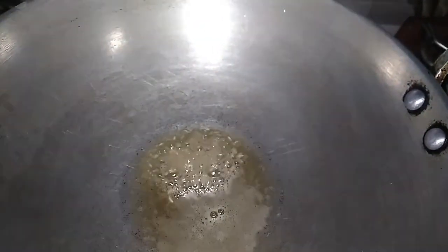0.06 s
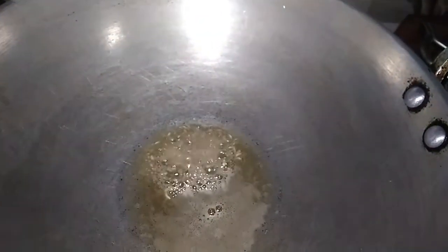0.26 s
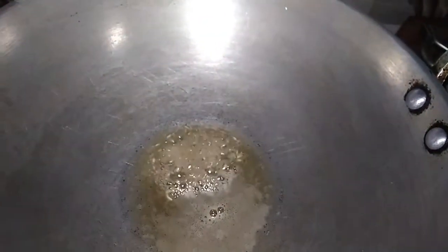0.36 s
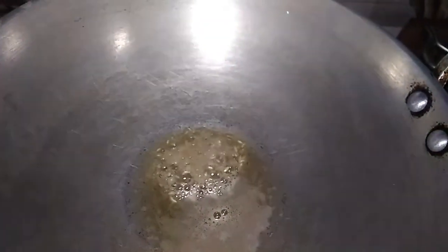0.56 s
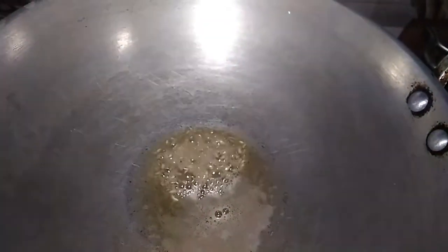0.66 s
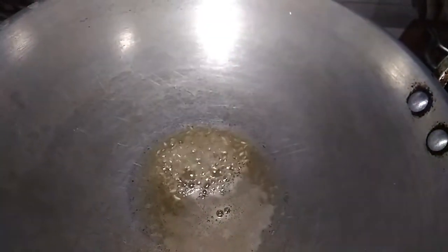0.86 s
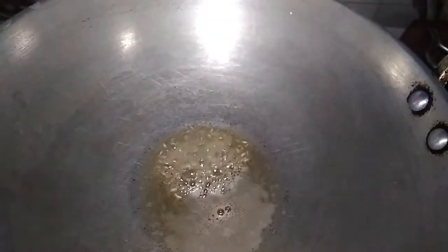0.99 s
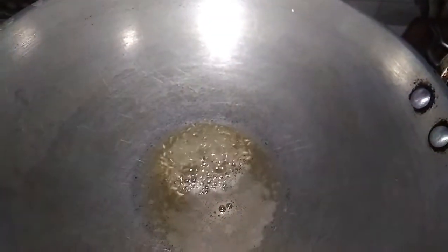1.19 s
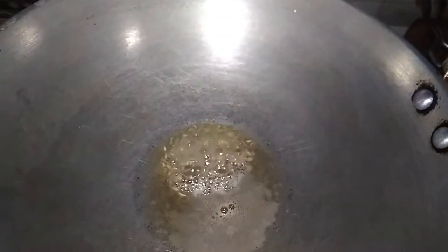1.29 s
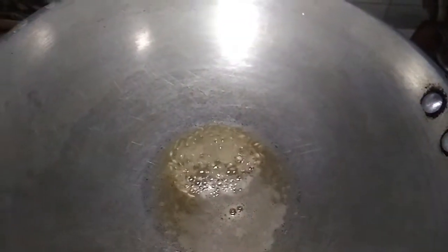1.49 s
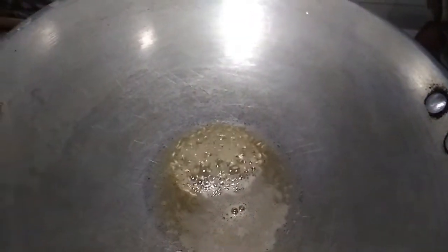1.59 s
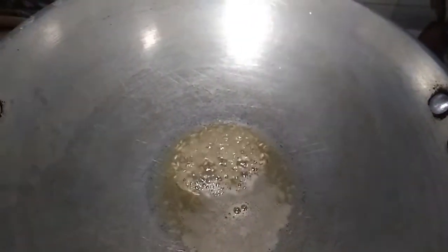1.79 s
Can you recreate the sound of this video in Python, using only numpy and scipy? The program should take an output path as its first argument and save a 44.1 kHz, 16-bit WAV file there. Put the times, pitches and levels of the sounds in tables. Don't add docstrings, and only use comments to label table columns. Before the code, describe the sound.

Bright crackling pops of spices in hot fat, one metallic clank, faint sizzle in a quiet kitchen

```python
import sys
import numpy as np
from scipy import signal
from scipy.fft import rfft, irfft, next_fast_len
from scipy.io import wavfile
from scipy.ndimage import uniform_filter1d

SR = 44100
rng = np.random.default_rng(int(sys.argv[2]) if len(sys.argv) > 2 else 0)


def store_wav(level_fs):
    pcm = np.round(np.clip(np.atleast_2d(level_fs), -1, 1) * 32767)
    wavfile.write(sys.argv[1], SR, pcm.T.astype(np.int16))


def invert_db(level):
    return 10 ** (np.asarray(level, dtype=float) / 20)


N = 81585

POP_TIMES_S = [.2008, .2115, .242, .2678, .27, .4694, .6792, .6848, .6898, .7697, .857, .9562, 1.0809,
               1.4724, 1.5227, 1.5756, 1.5972, 1.7933]
# (peak [dB], pitch [Hz], spray t60 [s], spray re peak [dB])
POP_VOICES = [(-22, 6850, 0.26, -22.5), (-17, 9400, 0.95, -37), (-28, 7900, 0.44, -41),
              (-29.5, 8700, 0.25, -33), (-18.5, 7800, 0.46, -27), (-8, 7730, 0.079, -26.5),
              (-28.5, 7700, 0.66, -12.5), (-17, 7350, 0.15, -20.5), (-19, 9000, 0.3, -32),
              (-18.5, 6360, 0.32, -18.5), (-25, 7050, 0.36, -21.5), (-59, 9270, 0.24, -7),
              (-36, 9100, 0.26, -28), (-24.5, 9400, 0.83, -27), (-27, 6940, 0.39, -22),
              (-23.5, 7200, 0.34, -18), (-37.5, 9500, 0.4, -16.5), (-45, 8700, 0.24, -14.5)]
SECOND_VOICE_TIMES_S = [.2126, .4696, .686, 1.0815, 1.474]
# (peak [dB], pitch [Hz], spray t60 [s], spray re peak [dB])
SECOND_VOICES = [
    (-28.5, 12000, .3, -19.5),
    (-20.5, 6500, 0.51, -14.5),
    (-36, 12100, 0.82, -8),
    (-46, 14000, 0.57, -13),
    (-50.5, 10500, 0.27, -1.5),
]
BOWL_ECHO_DB = [
    [2],
    [-8],
]
# (frequency [Hz], density [dB/Hz])
SPRAY_COLOUR = [(880, -51.5), (1500, -15), (2380, 7), (3770, -24), (6400, -23.5), (7980, -5.5),
                (15000, -33.5), (15400, -36.5), (16400, -99.5)]
# (time [s], peak [dB], pan [dB], pitch [Hz])
SNAP_EVENTS = [
    (0.2248, -50.5, 15, 1840),
    (0.4694, -26, 5, 2220),
    (0.77, -37.5, 14, 4800),
    (1.522, -58, 4, 2980),
    (1.5744, -32.5, 9, 2870),
    (1.794, -61, 6, 4000),
]
# (frequency [Hz], density [dB/Hz])
SNAP_COLOUR = [(59, -47.5), (100, -5.5), (1010, 3), (1560, -29), (2130, -5), (4460, 15.5), (5000, 18),
               (6500, -51), (11000, -120)]
# (time [s], peak [dB], pan [dB], t60 [s], low body [dB])
CLANK_EVENTS = [
    (0.6838, -18.5, 8, 0.34, 5),
    (0.845, -51.5, 6, 0.79, 20.5),
    (0.883, -43, 7, 0.28, 13.5),
    (0.951, -41, 7.5, 0.21, 9),
    (1.001, -51, 4.5, 0.57, 13.5),
    (1.082, -39.5, 7, 0.36, 14),
    (1.135, -47, 7, 0.15, 20),
]
# (frequency [Hz], level [dB])
STEEL_MODES = [(312.2, -73.5), (608.3, -71.5), (1217, -80.5), (1728, -54.5), (1787, -63), (1863, -61.5),
               (1986, -52), (2008, -48.5), (2062, -55.5), (2169, -75.5), (2239, -65.5), (2293, -51),
               (2347, -53.5), (2799, -69)]
# (frequency [Hz], density [dB/Hz])
CLATTER_COLOUR = [(150, -50.5), (260, -17.5), (1100, -13.5), (2050, -1), (4310, -22), (8340, -15.5),
                  (12900, -24), (15600, -37), (16400, -83)]
# (frequency [Hz], width [Hz], gain [dB])
LOW_BODY_MODES = [(313, 30, 6), (591, 49, -5.5), (430, 17, 1), (970, 130, -2), (1221, 80, 5.5)]
RATTLE_TIMES_S = [.0003, .0038, .0078]
# (time [s], level [dB], half length [s], pan [dB], frequency [Hz])
THUMP_EVENTS = [(0.039, -64.5, 0.024, 9, 69), (0.143, -68, 0.024, 5, 86.6), (0.326, -79.5, 0.015, 2, 85),
                (0.478, -49, 0.0047, 12, 40), (0.611, -84, 0.071, 31, 83.2),
                (0.707, -62, 0.0082, 17.5, 49.8), (0.758, -48, 0.02, 5.5, 77.2),
                (0.942, -70, 0.063, 7.5, 81.5), (1.501, -81, 0.011, 31, 39.6), (1.601, -51, 0.027, 9, 73.8),
                (1.797, -69.5, 0.032, 9, 79)]
# (time [s], level [dB], pan [dB])
FIZZ_COURSE = [(0.0, -56.5, 21.5), (0.158, -57, 20), (0.226, -47, 3.5), (0.432, -54.5, 14.5),
               (0.468, -51.5, 12.5), (0.475, -41, 6.5), (0.69, -51.5, 8.5), (0.752, -54, 16.5),
               (0.864, -51, 7.5), (1.01, -81.5, 21), (1.499, -73.5, 4), (1.526, -60.5, 24), (1.808, -84, 1),
               (1.85, -80, 19)]
# (frequency [Hz], density [dB/Hz])
FIZZ_COLOUR = [(710, -79.5), (1200, -33.5), (2880, -20.5), (4760, -23.5), (5140, -10.5), (8410, 1.5),
               (12100, -16.5), (15700, -25), (16400, -54)]
# (frequency [Hz], density [dB/Hz])
AIR_COLOUR = [(230, -46.5), (300, -27), (497, -23), (1520, -24), (4810, -7), (5700, -10), (8410, -2),
              (13800, -16.5), (16400, -25.5)]
# (frequency [Hz], pan [dB])
AIR_PAN_CURVE = [(60, 8.5), (240, 7.5), (950, 4), (3770, 8), (15000, 1.5)]
# (frequency [Hz], share [0-1])
COMMON_SHARE = [(100, 0.88), (600, 0.85), (2500, 0.071), (10000, 0.28)]
# (frequency [Hz], gain [dB])
RIGHT_PORT_GAIN = [(300, 1), (2000, -3.5), (7000, -10.5), (10000, 2), (15000, 3)]
# (frequency [Hz], width [Hz], depth [dB])
HOUSING_DIPS = [(1590, 120, 4.5), (4585, 240, 6.5), (3410, 210, 1.5)]

CLICK_T60_S, BOWL_DELAY_S, FLIGHT_S = 0.0008, 0.0011, 0.0001
CLICK_WIDTH, CLICK_SKIRT = 0.4, 0.9
POP_PAN_DB, SPRAY_PAN_DB, GRAIN_DB = 6.5, 2.5, 1.8
SPRAY_DRIES_S, BOWL_COLOUR_SHARE = 0.13, 0.2
SNAP_S, SNAP_ROOM_DB, SNAP_ROOM_T60_S = 0.003, -13, 0.25
CRACK_DB, CRACK_WIDTH = 6, 1.1
CLANK_RISE_S, SOFTER_PER_DB, CLANK_DRIES_S = 0.00025, 0.2, 0.48
RING_DB, RING_T60_S = 46, 0.23
BODY_HZ, BODY_WIDTH_HZ, BODY_GAIN = 2207, 690, 0.52
RATTLE_DB, RATTLE_HZ, RATTLE_WIDTH_HZ = 4.5, 1900, 830
OVERTONE_RATIO, OVERTONE_DB = 1.9, -11
RUMBLE_DB, RUMBLE_FLOOR_DB = -10, -93
BUBBLES_PER_S, BUBBLE_SPREAD_DB, AIR_DB = 960, 7, -65
TOP_HZ, LEFT_LAG_S = 16600, 0.00023
T = np.arange(SR // 2) / SR


def unit(x):
    return x / np.sqrt(np.mean(x ** 2, axis=-1, keepdims=True) + 1e-20)


def top_one(x):
    return x / np.abs(x).max(axis=-1, keepdims=True)


def along(points, hz):
    f, v = np.transpose(points)
    return np.interp(np.log(hz + 1), np.log(f + 1), v)


def filtered(x, response):
    m = next_fast_len(x.shape[-1] + 4096)
    return irfft(rfft(x, m) * response(np.fft.rfftfreq(m, 1 / SR)), m)[..., :x.shape[-1]]


def peak(hz, centre_hz, width_hz):
    return 1j * hz * width_hz / (centre_hz ** 2 - hz ** 2 + 1j * hz * width_hz)


def noise(response, size):
    share = lambda f: np.clip(along(COMMON_SHARE, f), 0, 1)
    common = filtered(rng.standard_normal(size), lambda f: response(f) * np.sqrt(share(f)))
    own = filtered(rng.standard_normal((2, size)), lambda f: response(f) * np.sqrt(1 - share(f)))
    return unit(common + own)


def burst(response, shape):
    gate = lambda f: np.minimum(np.abs(response(f)) / np.abs(response(f)).max() * 8, 1)
    return filtered(noise(response, size=len(T)) * shape, gate)


def fading(t60_s, dries_s):
    return invert_db(-60 * T / t60_s - 10 * (T / dries_s) ** 2)


def sides(pan_db):
    return invert_db(np.multiply.outer([0.5, -0.5], np.atleast_1d(pan_db)))


def add(out, s, x):
    out[:, max(round(s * SR), 0):][:, :x.shape[1]] += x


def pops():
    out = np.zeros((2, N + SR))
    times_s = [*POP_TIMES_S, *SECOND_VOICE_TIMES_S]
    voices = [*POP_VOICES, *SECOND_VOICES]
    for s, (db, hz, t60_s, spray_db) in zip(times_s, voices):
        band = lambda f: peak(f, hz, CLICK_WIDTH * hz) ** 2 * peak(f, hz, CLICK_SKIRT * hz) ** 2
        click = top_one(filtered(invert_db(-60 * T / CLICK_T60_S) * rng.standard_normal(len(T)), band))

        late_s = np.maximum(T - BOWL_DELAY_S, 0)
        echo_shape = (T >= BOWL_DELAY_S) * invert_db(-60 * late_s / 0.003)
        echo = invert_db(BOWL_ECHO_DB) * top_one(filtered(echo_shape * rng.standard_normal((2, len(T))), band))

        grains = invert_db(GRAIN_DB * unit(uniform_filter1d(rng.standard_normal(len(T)), size=30)))
        bowl = lambda f: invert_db(BOWL_COLOUR_SHARE * along(SPRAY_COLOUR, f))
        low_cut = lambda f: 1 + (1700 / (f + 1)) ** 4
        colour = lambda f: bowl(f) * (0.011 + np.abs(peak(f, hz, 0.52 * hz)) ** 3) / low_cut(f)
        early = 1 + 1.2 * invert_db(-60 * T / 0.066)
        spray = burst(colour, grains * fading(t60_s, SPRAY_DRIES_S) * early)

        pop = sides(POP_PAN_DB) * (click + echo) + invert_db(spray_db + 3.0) * sides(SPRAY_PAN_DB) * spray
        add(out, s + FLIGHT_S, invert_db(db - 4.5) * pop)
    return out[:, :N]


def snaps():
    out = np.zeros((2, N + SR))
    loudest_db = max(row[1] for row in SNAP_EVENTS)
    shape = invert_db(-60 * T / (3 * SNAP_S)) + invert_db(SNAP_ROOM_DB) * fading(SNAP_ROOM_T60_S, 0.13)
    for s, db, pan_db, hz in SNAP_EVENTS:
        crack = top_one(filtered(1.0 * (T == 0), lambda f: peak(f, hz, CRACK_WIDTH * hz) ** 2))
        deep = 0.17 * invert_db(db - loudest_db)
        colour = lambda f: np.abs(peak(f, hz, 0.45 * hz)) ** 2 + deep * invert_db(along(SNAP_COLOUR, f))
        add(out, s, invert_db(db - 3.5) * sides(pan_db) * (burst(colour, shape) + invert_db(CRACK_DB) * crack))
    return out[:, :N]


def steel_ring():
    ring = 0
    for hz, level_db in STEEL_MODES:
        level = invert_db(level_db + rng.normal(0, 0.5))
        cycles = hz * T + rng.random() + 0.65 * rng.random((2, 1))
        ring = ring + level * np.sin(2 * np.pi * cycles)
    return ring * invert_db(RING_DB - 60 * T / RING_T60_S)


def low_body(f):
    modes = sum(invert_db(gain_db) * np.abs(peak(f, hz, width_hz)) ** 2 for hz, width_hz, gain_db in LOW_BODY_MODES)
    return 0.5 + modes + 0.5 * (f > 1400)


def clanks():
    out = np.zeros((2, N + SR))
    contacts = np.isin(np.arange(len(T)), np.round(np.multiply(RATTLE_TIMES_S, SR)))
    rattle = top_one(filtered(1.0 * contacts, lambda f: peak(f, RATTLE_HZ, RATTLE_WIDTH_HZ) ** 2))
    body = lambda f: 0.5 + BODY_GAIN * np.abs(peak(f, BODY_HZ, BODY_WIDTH_HZ)) ** 2
    low_cut = lambda f: 1 + (240 / (f + 1)) ** 6
    for s, db, pan_db, t60_s, body_db in CLANK_EVENTS:
        ring = steel_ring()
        tilt_db = lambda f: body_db * np.clip((1500 - f) / 900, 0, 1)
        clatter = lambda f: invert_db(along(CLATTER_COLOUR, f) + tilt_db(f))
        colour = lambda f: clatter(f) / low_cut(f) * body(f) * low_body(f)
        rise_s = CLANK_RISE_S * invert_db(SOFTER_PER_DB * (CLANK_EVENTS[0][1] - db))
        early = 1 + 0.24 * invert_db(-60 * T / 0.095)
        shape = (1 - np.exp(-T / rise_s)) * fading(5, CLANK_DRIES_S) * early
        blow = burst(colour, shape * invert_db(-60 * T / t60_s)) + shape * ring + invert_db(RATTLE_DB) * rattle
        add(out, s, invert_db(db - 11) * sides(pan_db) * blow)
    return out[:, :N]


def thumps():
    t = np.arange(N) / SR
    rumble = noise(lambda f: peak(f, 60.3, 180) ** 2 / (1 + (f / 220) ** 4), size=N)
    out = invert_db(RUMBLE_FLOOR_DB) * rumble
    for s, db, half_s, pan_db, hz in THUMP_EVENTS:
        turn = 2 * np.pi * hz * (t - s)
        swing = np.cos(turn) + invert_db(OVERTONE_DB) * np.cos(OVERTONE_RATIO * turn)
        push = swing / np.cosh((t - s) / half_s)
        stirred = invert_db(RUMBLE_DB) * rumble / np.cosh((t - s) / (1.48 * half_s))
        out = out + invert_db(db) * sides(pan_db) * (push + stirred)
    return out


def fizz():
    s, level_db, pan_db = np.transpose(FIZZ_COURSE)
    t = np.arange(N) / SR
    strikes = rng.random((2, N)) < BUBBLES_PER_S / SR
    sizes = invert_db(BUBBLE_SPREAD_DB * np.minimum(rng.exponential(size=(2, N)), 4))
    bursts = unit(strikes * sizes * rng.standard_normal((2, N)))
    hiss = 2.7 * rng.standard_normal((2, N))
    bubbles = unit(filtered(bursts + hiss, lambda f: invert_db(along(FIZZ_COLOUR, f))))
    return invert_db(np.interp(t, s, level_db)) * sides(np.interp(t, s, pan_db)) * bubbles


def kitchen_air():
    room = lambda f: 1 + 3.3 * np.abs(peak(f, 2050, 320)) ** 2 + 0.98 * np.abs(peak(f, 320.5, 120.4)) ** 2
    air = noise(lambda f: invert_db(along(AIR_COLOUR, f)) * room(f) * sides(along(AIR_PAN_CURVE, f)), size=N)
    return invert_db(AIR_DB) * sides(2.5) * air


def scene():
    return pops() + snaps() + clanks() + thumps() + fizz() + kitchen_air()


def roll_off(x):
    return signal.sosfilt(signal.butter(12, 16650, fs=SR, output="sos"), x)


def record(dry):
    dips = lambda f: invert_db(-sum(db * np.exp(-((f - hz) / w) ** 2) for hz, w, db in HOUSING_DIPS))
    left = lambda f: np.exp(-2j * np.pi * f * LEFT_LAG_S)
    right = lambda f: invert_db(along(RIGHT_PORT_GAIN, f))
    mix = filtered(dry, lambda f: (f < TOP_HZ) * dips(f) * np.array([left(f), right(f)]))
    return roll_off(mix)


dry = scene()
out = record(dry)
store_wav(out)
```